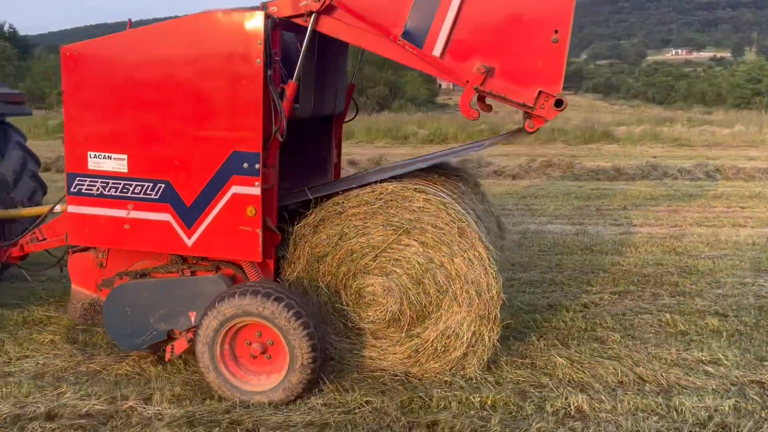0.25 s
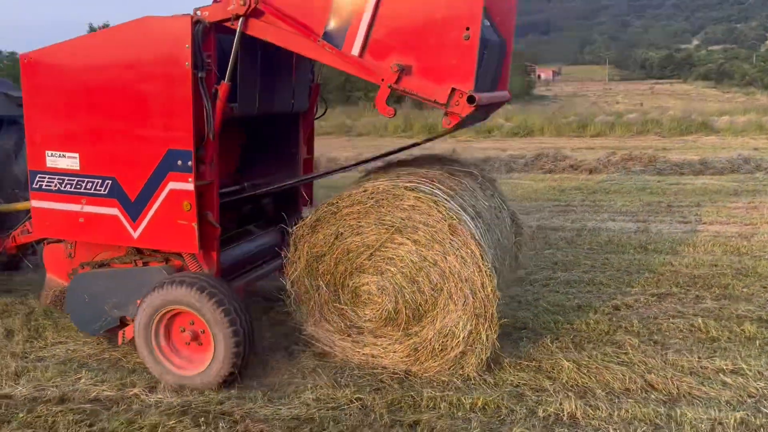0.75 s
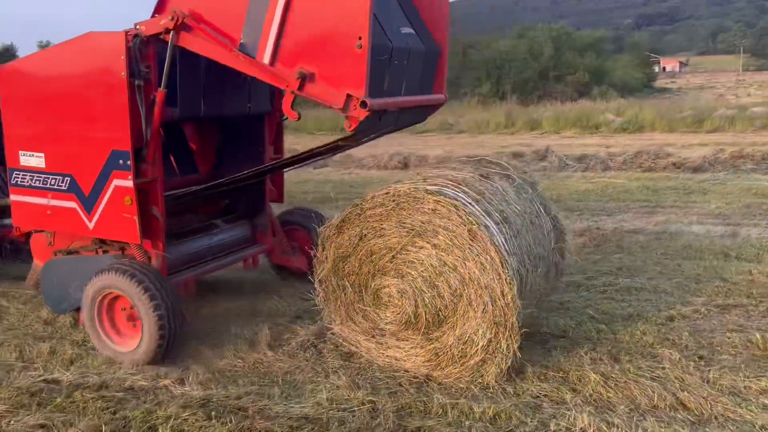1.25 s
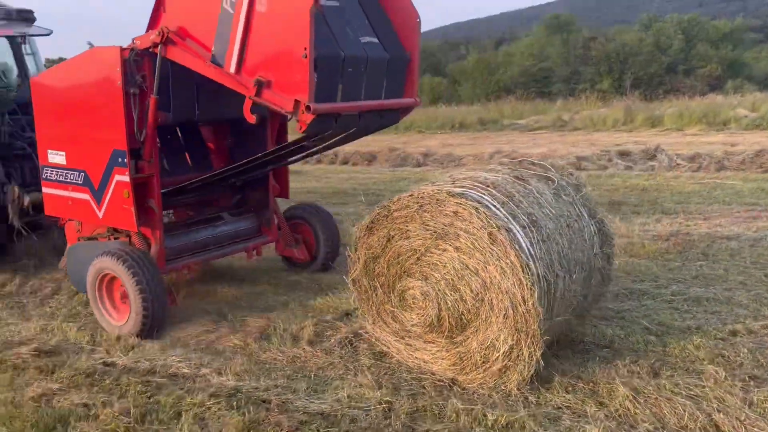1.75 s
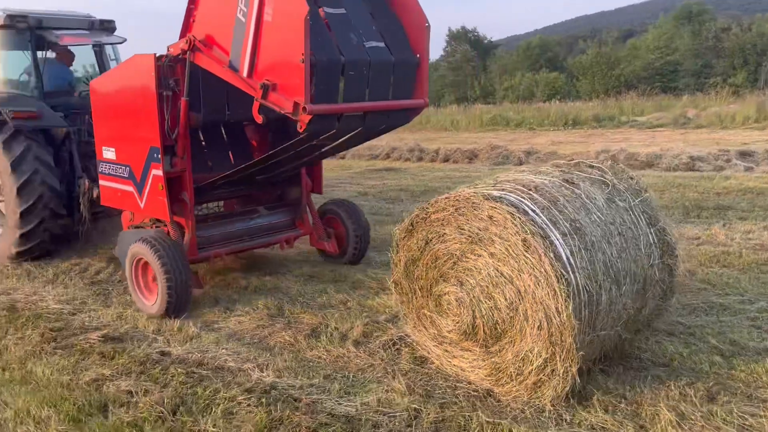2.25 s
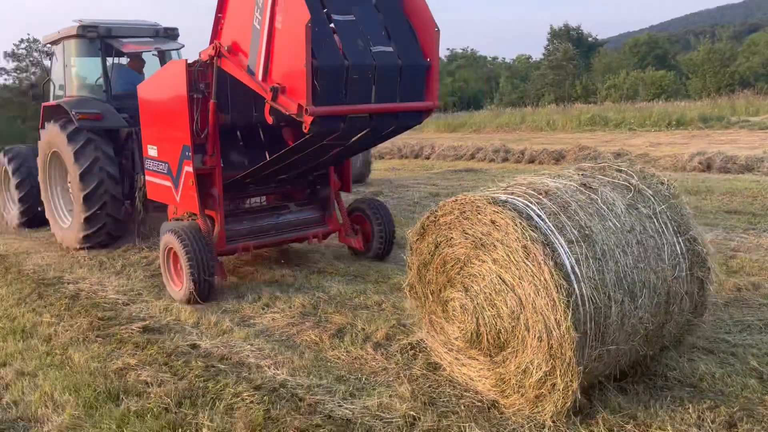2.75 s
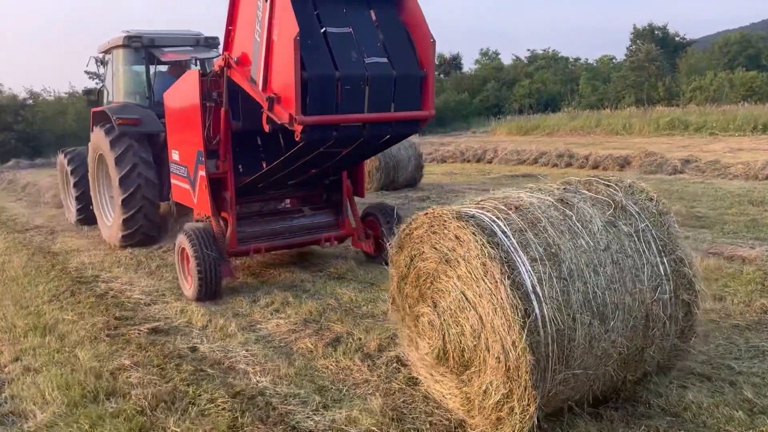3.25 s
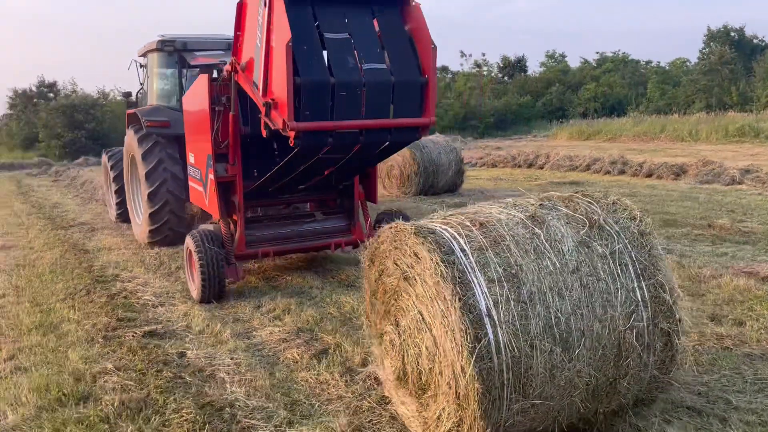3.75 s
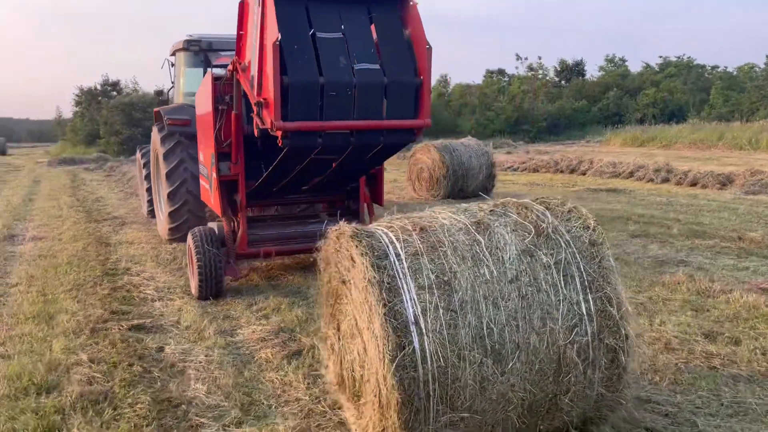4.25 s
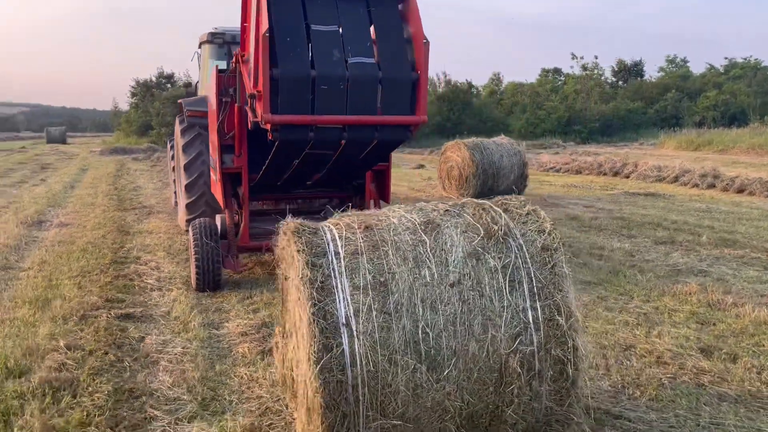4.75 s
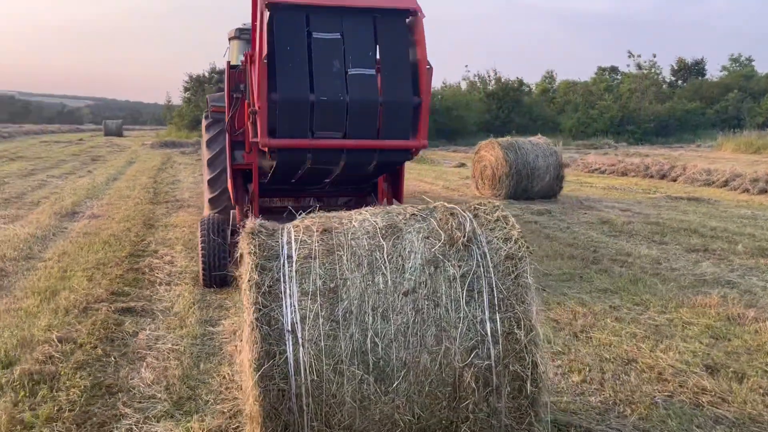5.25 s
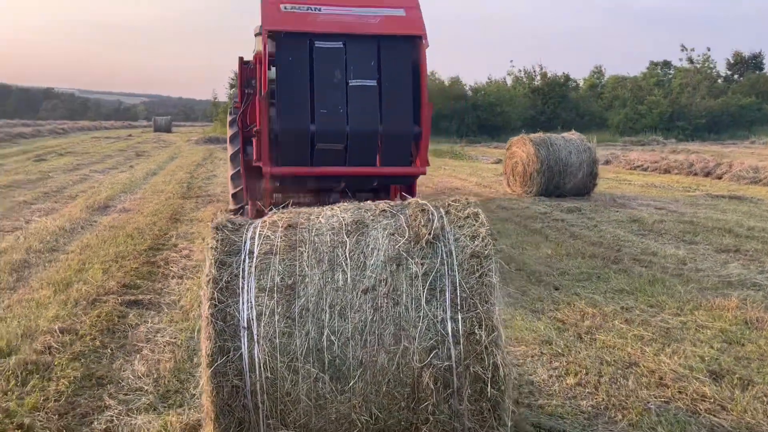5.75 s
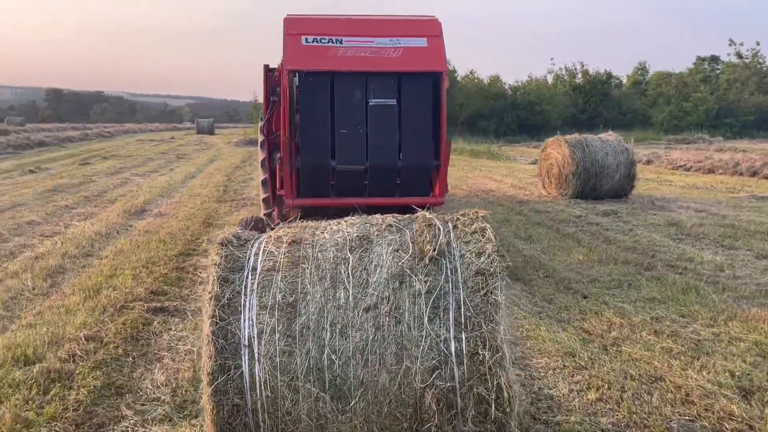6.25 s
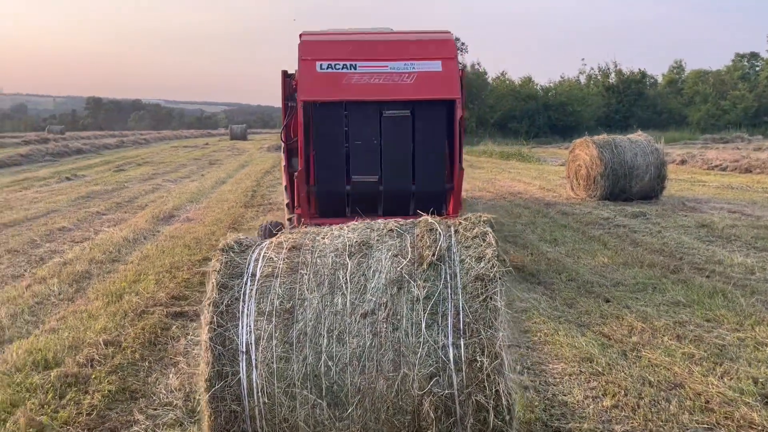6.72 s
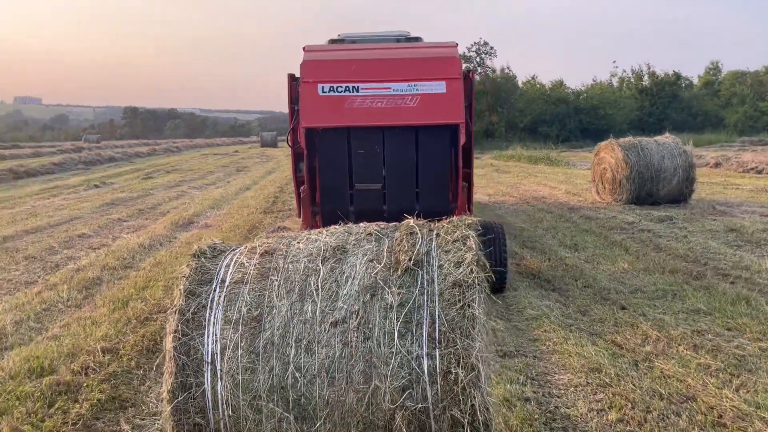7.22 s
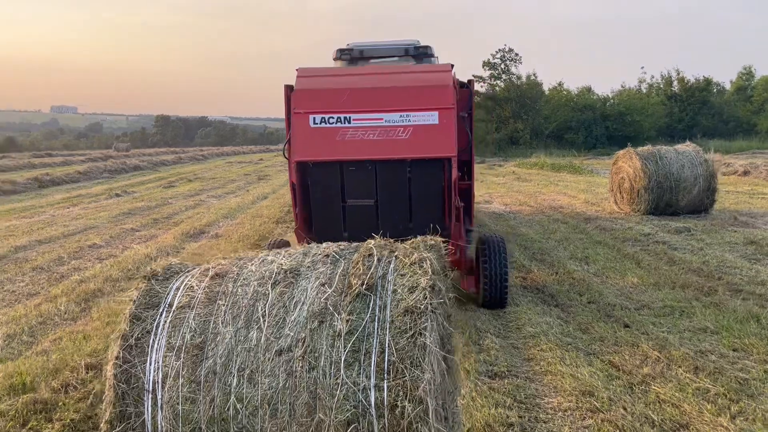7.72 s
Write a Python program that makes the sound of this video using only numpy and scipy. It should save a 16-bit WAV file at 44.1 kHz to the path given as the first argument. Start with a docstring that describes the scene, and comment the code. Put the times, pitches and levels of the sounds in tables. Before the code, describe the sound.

Tractor engine labours and recovers beside rattling chains and rollers; the clatter recedes, wind buffets grow, and small metallic squeaks sound in rhythm.

```python
"""Tractor and round baler leaving

A diesel tractor pulls a round baler away across a hay field: the engine bogs down, recovers and hums on
while the listener walks round behind. Engine tones follow the firing rate; clatter and wind are shaped noise.
Wind rumbles on the microphones, the tailgate hinge squeals once, a small part squeaks in rhythm
and a cricket chirps near the end: these are short tones."""
import sys
import numpy as np
from scipy import signal
from scipy.fft import rfft, irfft
from scipy.io import wavfile
from scipy.ndimage import uniform_filter1d, map_coordinates

SR = 44100
rng = np.random.default_rng(int(sys.argv[2]) if len(sys.argv) > 2 else 0)


def put_to_file(sound):
    """Save the sound as 16-bit audio at rate SR, in the file named by the first command-line argument."""
    columns = np.atleast_2d(sound).T  # one column per channel
    safe = np.clip(columns, -1, 1)
    whole_steps = np.round(safe * 32767)
    wavfile.write(sys.argv[1], SR, whole_steps.astype(np.int16))


N = 351907

# Spectrum tables give relative noise density; the level is set elsewhere.

# engine: time_s, firing_rate_hz, firing_tone_db, octave_db, fan_tone_db
ENGINE_COURSE = [(0, 80.6, -40, -31, -37), (.2, 80.2, -40, -32, -38), (.29, 77, -39, -43, -44),
                 (.36, 73.5, -36, -40, -50), (.56, 66.5, -34, -39, -52), (.7, 64.5, -34, -41, -52),
                 (.89, 66.5, -35, -41, -51), (1.07, 75, -39, -42, -48), (1.2, 80, -42, -44, -42),
                 (1.4, 80.7, -46, -46, -38), (2.7, 81.1, -50, -50, -41), (3.5, 81.1, -50, -50, -37),
                 (5, 81.1, -50, -43, -37), (6, 81, -50, -39, -35), (7, 80.9, -50, -39, -35.5),
                 (7.98, 80.9, -50, -36, -38)]
# gear and shaft tones: multiple of firing rate, five level_db evenly spaced over the scene, pitch_waver_hz
GEAR_TONES = [(3.19, -66, -57, -49, -42, -49, 2.34), (3.335, -71, -74, -55, -43.5, -60, 2.5),
              (3.524, -58, -56, -55.5, -55, -51.5, 2.96), (7.575, -50, -62.5, -54.5, -55.5, -61.5, 1.73),
              (12.06, -52, -61, -62.5, -67, -73, 4), (16.12, -75, -61, -57.5, -73, -85, 2.5)]
# pump tone between spells, for multiples 1 to 5 of its tooth rate: level_db
PUMP_FAINT_DB = [-60, -71, -63.5, -74, -69.5]
# hydraulic gear pump, a list for each multiple, heard in spells as the baler body turns: start_s, end_s, level_db
PUMP_SPELLS = [
    [(-.1, .25, -53), (1.1, 2.9, -48), (2.9, 4.38, -45.5), (5.6, 8.1, -54)],
    [(-.1, .28, -42), (.3, .52, -48), (.9, 1.2, -50), (1.45, 2, -54), (2.2, 3.4, -51), (3.4, 4.4, -49),
     (4.4, 5.3, -53.5), (5.3, 5.6, -62), (6.3, 8.1, -63)],
    [(-.1, .2, -51), (.18, .5, -42), (.85, 1.05, -45), (1.1, 1.27, -45), (1.45, 1.9, -47), (3.8, 4.35, -57),
     (5.6, 5.85, -63), (6.1, 7.2, -64)],
    [(1.5, 2.4, -50), (2.9, 3.1, -54), (3.5, 4.2, -55.5)],
    [(1.4, 1.7, -65), (2, 2.32, -65), (3.4, 3.75, -73), (5.4, 5.7, -76)],
]
# engine block growl under load: time_s, level_db
GROWL_LEVEL = [(0, -53), (.25, -50.5), (.6, -51), (1.1, -50), (1.35, -58), (2.2, -66), (7.98, -70)]
# clear growl tones: multiple of firing rate, level_over_growl_db
GROWL_TONES = [(3, -13.5), (3.5, -7), (4, -3.5), (4.5, -4), (5.5, -10.5), (6.5, -7.5), (7, -5.5), (7.5, -4),
               (8, -8.5), (8.5, -8), (9.5, -12.5), (12, -8.5), (12.7, -6.5), (13.7, -6.5), (14.5, -5.5),
               (18, -7.5), (19, -9)]
# exhaust bark: time_s, level_db
EXHAUST_LEVEL = [(0, -48), (.3, -40), (1.15, -40), (1.4, -50), (3, -58), (7.98, -58)]
# pulse strength of each cylinder in firing order: level_db
CYLINDER_DB = [0, -12, 0, -13]
# colour of the exhaust pipe: pitch_hz, gain_db
PIPE_COLOUR = [(170, -29), (230, -6), (290, 3), (330, -2.5), (400, -12.5), (520, -6.5), (600, -4.5),
               (750, -9.5), (1050, -10), (1300, -4.5), (1550, -13), (1800, -26.5)]
# turbocharger whistle: time_s, pitch_hz, level_db
TURBO_WHISTLE = [(0, 4380, -78), (.3, 4160, -53), (.8, 4370, -72), (1.15, 4570, -61), (1.6, 4420, -60.5),
                 (2.2, 4090, -62.5), (2.8, 3920, -79)]
# clatter, sinking as the baler draws off and hides behind the bale: time_s, level_db
CLATTER_LEVEL = [(0, -46), (.93, -45), (1.8, -50.5), (2.6, -53), (4.2, -54), (5.1, -56.5), (5.6, -59.5),
                 (6.1, -60), (7.3, -61), (7.98, -59)]
# exhaust roar spectrum: pitch_hz, density_db_per_hz
ROAR_SPECTRUM = [(60, -25), (150, -12), (300, 2), (500, -1.5), (800, -2), (1250, -2), (1600, -7.5),
                 (1900, -26), (2600, -42.5)]
# chain and roller clatter spectrum: pitch_hz, density_db_per_hz
CLATTER_SPECTRUM = [(1200, -26), (1800, 5), (2200, -6), (2500, -1.5), (2800, -3.5), (3100, -4.5),
                    (3600, -6.5), (4700, -5), (5300, -11), (6500, -14.5), (8000, -37.5)]
# air hiss spectrum: pitch_hz, density_db_per_hz
HISS_SPECTRUM = [(5500, -16.5), (7000, 1.5), (8500, 3.5), (9600, -3), (10300, -1.5), (11000, -1.5),
                 (11700, -6.5), (11950, -29)]
# panel rattle: time_s, level_db
RATTLE_LEVEL = [(0, -44), (.3, -40), (1.1, -43), (1.5, -59), (3, -69), (7.98, -59)]
# panels shaken under load: pitch_hz, density_db_per_hz
RATTLE_SPECTRUM = [(450, -16), (650, -8.5), (1300, 0), (1600, 7.5), (1850, -18), (2300, -2.5), (2600, -12),
                   (2850, -15.5), (3150, -8.5), (3500, -20.5)]
# belt and bearing whines: pitch_hz, pitch_waver_hz, faint_over_clatter_db, clear_start_s, clear_end_s,
# added_clear_over_clatter_db, fade_s
WHINES = [(3077, 30, -24.5, 2, 5.4, -15.5, .5), (4460, 35, -26.5, 1.6, 3.8, -18.5, .5),
          (4880, 30, -29.5, 2.9, 3.75, -15, .15), (5840, 37, -38, 2, 5, -19.5, 1)]
# tones that keep their pitch when the engine bogs down: pitch_hz, faint_db, spells of (start_s, end_s, level_db)
STEADY_TONES = [(1064, -69, [(-.1, .3, -46), (.4, .57, -43.5), (1.2, 2, -53.5), (2.3, 2.6, -56),
                (4.4, 5.3, -62.5), (6.15, 6.6, -64.5), (7.2, 8.1, -64.5)]), (1603, -69.5, [(-.1, .3, -48),
                (.5, .72, -43.5), (1.3, 2, -53), (2, 2.6, -58), (5.9, 6.9, -70)])]
# tailgate pivot slips: start_s, length_s, slip_rate_hz, level_db, overtone_flare_s, flare_db
HINGE_SLIPS = [(5.146, 0.05, 1928, -46, 5.182, -56.5), (5.2, .08, 1922, -47, 5.25, -72),
               (5.288, 0.06, 1914, -48.5, 5.332, -59.5), (5.355, .045, 1895, -58, 5.395, -63)]
# rhythmic squeaks: time_s, peak_db (before roughening)
SQUEAKS = [(3.83, -50), (3.9454, -54), (4.0467, -57), (4.16, -53), (4.262, -55), (4.37, -52),
           (4.468, -50.5), (4.572, -49.5), (4.674, -50), (4.782, -52), (4.89, -54), (5.002, -53.5),
           (5.102, -54.5), (5.207, -51), (5.308, -51.5), (5.42, -53), (5.545, -54), (5.66, -59),
           (5.765, -60)]
# swells of the faint tone under the squeaks: start_s, end_s, level_db
RUB_SPELLS = [(3.58, 3.88, -64), (4.4, 4.85, -74), (7.8, 8.1, -72)]
# cricket chirps: start_s, peak_db (before roughening)
CHIRPS = [(6.312, -65), (7.0, -63.5), (7.341, -62), (7.674, -61)]
# wing strokes of one chirp: level_over_chirp_db, pitch_hz (the pitch slides around it)
WING_STROKES = [(-4, 4680), (-0.5, 4870), (0, 4890)]
# soft tick from the baler: peak_s, level_db
TICKS = [(5.922, -49.5)]
# tick resonances: pitch_hz, density_db_per_hz
TICK_SPECTRUM = [(700, -20), (1200, 7), (1800, -12), (2450, -1), (3300, -19), (3900, -12), (4300, -1),
                 (4800, -16), (7400, -20)]
# steady wind: time_s, rumble_db, flutter_db, ruffle_db
STEADY_WIND = [(0, -45.5, -42, -72), (.9, -39, -41, -63), (1.7, -37.5, -41, -50), (2.1, -33.5, -35, -49),
               (2.5, -35.5, -39.5, -57), (2.75, -32, -41, -56), (2.9, -32.5, -30, -50),
               (3.5, -30, -36, -45), (4.1, -32, -36.5, -43), (4.8, -27, -37.5, -44.5),
               (5.4, -29.5, -43.5, -46.5), (6.2, -28.5, -34.5, -42.5), (6.7, -29.5, -36.5, -42),
               (7.1, -28.5, -30.5, -39.5), (7.6, -24, -26.5, -37.5), (7.8, -36, -25, -41),
               (7.98, -41, -27, -36)]
# wind buffets: peak_s, width_s, rumble_db, flutter_db, ruffle_db
BUFFETS = [(1.817, 0.039, -30, -44, -56), (2.091, 0.014, -28, -20.5, -39), (2.218, 0.044, -32, -43, -53),
           (2.31, 0.062, -30, -55, -49), (2.649, 0.014, -36, -28.5, -55), (2.685, 0.0094, -26, -34, -31),
           (2.782, 0.024, -39, -28, -49), (2.868, 0.012, -36, -36, -33.5), (2.908, 0.017, -28, -40, -38),
           (2.947, 0.012, -20, -35, -51), (2.995, 0.02, -37, -29, -52), (3.118, 0.037, -22, -28, -44),
           (3.207, 0.011, -18, -21, -42.5), (3.358, 0.033, -37, -27, -50), (3.412, 0.028, -29, -37, -40),
           (3.63, 0.058, -37, -29.5, -57), (3.68, 0.023, -31, -54, -58), (3.76, 0.047, -29, -34, -56),
           (3.859, 0.036, -22, -35, -54), (3.914, 0.022, -22, -28, -40), (4.263, 0.017, -26, -22, -36),
           (4.337, 0.037, -37, -27, -43), (4.375, 0.015, -37, -31, -52), (4.43, 0.02, -25.5, -42, -47),
           (4.553, 0.026, -24, -39, -42), (4.7, 0.011, -20, -20.5, -29), (4.84, 0.032, -29, -31, -35.5),
           (4.982, 0.016, -32, -29, -37), (5.06, 0.016, -26, -28, -37), (5.144, 0.034, -35, -30, -41),
           (5.2, 0.014, -41, -32, -36.5), (5.272, 0.015, -22.5, -27.5, -52),
           (5.544, 0.066, -28.5, -30.5, -42), (5.617, 0.021, -28, -31, -45), (5.733, 0.014, -21, -40, -42),
           (5.894, 0.01, -22, -42, -40), (5.946, 0.016, -25, -34, -37), (6.115, 0.026, -30, -41, -44),
           (6.207, 0.037, -32, -30, -39), (6.277, 0.01, -21, -19.5, -50), (6.342, 0.012, -25, -20, -32.5),
           (6.428, 0.024, -18.5, -25.5, -41.5), (6.502, 0.1, -27, -28.5, -39.5),
           (6.894, 0.032, -26, -37, -40), (7.024, 0.048, -24, -28, -38), (7.256, 0.037, -28.5, -28, -37),
           (7.293, 0.047, -17, -26.5, -42), (7.338, 0.017, -25, -24.5, -30.5),
           (7.427, 0.017, -18, -20.5, -35), (7.721, 0.028, -21, -20, -41), (7.76, 0.012, -19.5, -16, -34.5)]
# deep wind: pitch_hz, density_db_per_hz
RUMBLE_SPECTRUM = [(15, -37.5), (28, -28.5), (40, -8), (52, -5), (75, 1), (100, -0.5), (125, -8.5),
                   (170, -27)]
# middle wind: pitch_hz, density_db_per_hz
FLUTTER_SPECTRUM = [(80, -31.5), (120, 1), (160, 1.5), (210, -5.5), (260, -13), (340, -38.5)]
# light wind: pitch_hz, density_db_per_hz
RUFFLE_SPECTRUM = [(180, -26), (240, 0), (290, -2.5), (350, -13.5), (430, -16.5), (600, -21.5)]
# wind: pitch_hz, left_right_likeness (0 to 1)
WIND_LIKENESS = [(30, .88), (100, .82), (200, .68), (350, .7)]
# machine noise: pitch_hz, left_right_likeness (0 to 1)
MACHINE_LIKENESS = [(60, .85), (500, .86), (1000, .84), (1500, .8), (1750, .7), (2000, .9), (2250, .94),
                    (2500, .7), (3500, .6), (4700, .55), (5400, .75), (6300, .8), (6900, .45), (7600, 1),
                    (9300, 1), (10000, .4), (10600, 1), (12000, 1)]
# the two ports: pitch_hz, left_lead_for_source_ahead_rad, extra_lead_for_source_at_left_rad
PORT_LEAD = [(100, 0, .1), (320, 0, .3), (500, -.05, .75), (700, 0, 1.15), (900, .05, 1.7), (1100, 0, 2.1),
             (1400, .2, 2.7), (1700, .2, 2.9), (2000, .25, 0), (2400, .3, 0), (3000, .5, .3),
             (3900, .35, .3), (4900, -.15, 1.2), (5500, -.3, 0), (6940, -.5, 0)]
# level difference of the ports: pitch_hz, left_over_right_db
PORT_BALANCE = [(100, 0), (500, 0.5), (750, -1), (990, 4), (1192, -3.5), (1548, -7), (1754, 1.5),
                (2400, 0.5), (3040, 5), (4240, 3), (5000, 7), (5900, 0.5), (6940, -1.5)]
# phase flips in the treble, where both ports match in level: pitch_hz, half_turns
PORT_FLIPS = [(6600, 0), (7600, -1), (9600, -1), (10500, -2)]
# how far left the tractor stands: time_s, leftness (0 to 1)
LEFTNESS = [(0, 1), (1.2, .97), (2, .72), (3.2, .44), (4.7, .32), (5.7, .08), (7.98, 0.02)]

FAN_ORDER, PUMP_ORDER = 2.53, 416 / 81  # multiples of the firing rate
FIRING_JITTER, FIRING_SCATTER_DB = .002, .8  # uneven timing (share of a period) and strength
SMEAR_T60_S = .025  # time for the exhaust smear to fall 60 dB
ROAR_START_DB, HISS_START_DB = -39, -55
ROAR_FOLLOWS, HISS_FOLLOWS = 0.63, 1  # dB lost for each dB of clatter lost
SLIP_FADE_S, FLARE_WIDTH_S = .015, .02
OVERTONE_DB = -23  # octave under the hinge tone outside flares
SQUEAK_HZ, SQUEAK_S = 2462, 0.05  # the pitch slides around this
SQUEAK_LEAD_S = 0.0054  # a squeak starts softly this early
RUB_HZ, RUB_FAINT_DB = 2425, -71
STROKE_S, STROKE_GAP_S = 0.024, .033  # length of a wing stroke, start to start
TICK_WIDTH_S = .016
LULL_DB, LULL_RATE_HZ = 3, 10  # random unevenness of the steady wind
TOP_HZ = 11950  # no sound is passed on much above this


def amp(db):
    """Turn decibels into a plain gain."""
    return 10 ** (np.asarray(db) / 20)


def unit(x):
    """Scale to an rms of 1."""
    return x / np.sqrt(np.mean(x ** 2) + 1e-20)


def along(points, hz):
    """Read each column of a table at the given pitches, on a log pitch axis."""
    f, *columns = np.transpose(points)
    return np.squeeze([np.interp(np.log(hz + 1), np.log(f + 1), c) for c in columns])


def curves(rows):
    """One value per sample for each column after the time."""
    s, *columns = np.transpose(rows)
    return [np.interp(np.arange(N) / SR, s, c) for c in columns]


def wobble(rate):
    """A smooth random curve through rate random points a second."""
    points = rng.standard_normal(int(N * rate / SR) + 4)
    return map_coordinates(points, [np.arange(N) * rate / SR])


def spells(rows, fade_s):
    """Summed gain of (start_s, end_s, level_db) stretches with soft edges."""
    t = np.arange(N) / SR
    total = 0
    for start, end, db in rows:
        rise = np.tanh(2 * (t - start) / fade_s)
        fall = np.tanh(2 * (t - end) / fade_s)
        total = total + amp(db) * (rise - fall) / 2
    return total


def bells(rows):
    """Summed gain of (peak_s, width_s, level_db) swells; the width is taken 3 dB under the peak."""
    out, u = np.zeros(N + SR), np.arange(-SR // 4, SR // 4) / SR
    for s, width_s, db in rows:
        out[round(s * SR):][:len(u)] += amp(db) * np.exp(-np.log(4) * (u / width_s) ** 2)
    return out[SR // 4:][:N]


def tone(hz, db, width_hz, count=25):
    """A sine near rms level db; its level wavers and its pitch wavers count times a second."""
    phase = 2 * np.pi * np.cumsum(hz + width_hz * wobble(count)) / SR
    level = amp(db + 1.3 * wobble(12))
    return np.sqrt(2) * level * np.sin(phase + 2 * np.pi * rng.random())


def rush(spectrum, alike, patchy_db, size=1024):
    """Stereo noise of rms 1 with patches of random gain, silent outside its spectrum."""
    hz, _, (a, b) = signal.stft(rng.standard_normal((2, N)), SR, nperseg=size)
    patches = uniform_filter1d(rng.standard_normal(a.shape), size=6, axis=0)
    patches = uniform_filter1d(patches, size=5, axis=1)
    inside = (hz > spectrum[0][0]) & (hz < spectrum[-1][0])
    gain = amp(along(spectrum, hz)[:, None] + patchy_db * unit(patches)) * inside[:, None]
    # the more alike the sides, the more of the shared noise
    turn = np.arccos(np.clip(along(alike, hz), 0, 1))[:, None] / 2
    mid, side = a * np.cos(turn), b * np.sin(turn)
    return unit(signal.istft(gain * [mid + side, mid - side], nperseg=size)[1][:, :N])


def strokes(rows, length_s, glide, bend, fullness):
    """Short swelling tones from rows (start_s, peak_db, pitch_hz); the pitch slides by the share glide."""
    out, u = np.zeros(N + SR), np.arange(round(length_s * SR)) / (length_s * SR)
    swell = np.sin(np.pi * u ** .8) ** fullness
    for s, db, hz in rows:
        phase = 2 * np.pi * np.cumsum(hz * (1 + glide * (u ** bend - .2))) / SR
        out[round(s * SR):][:len(u)] += amp(db) * swell * np.sin(phase)
    return out[:N]


def engine():
    """Firing tones, fan, gears and the pump all follow the crankshaft."""
    hz, first_db, octave_db, fan_db = curves(ENGINE_COURSE)
    out = tone(hz, first_db + 1.3 * wobble(19), 1.77)
    out = out + tone(2 * hz, octave_db + 2.0 * wobble(21), 1.45)
    out = out + tone(FAN_ORDER * hz, fan_db, 1.524)
    for multiple, *steps_db, width_hz in GEAR_TONES:
        level_db = np.interp(np.arange(N), np.linspace(0, N, len(steps_db)), steps_db)
        out = out + tone(multiple * hz, level_db + 0.49 * wobble(1.7), width_hz)
    for k, (faint_db, rows) in enumerate(zip(PUMP_FAINT_DB, PUMP_SPELLS), 1):
        gain = amp(faint_db) + spells(rows, PUMP_FADE_S)
        # higher multiples waver more
        uneven_db = (1 + .2 * k) * wobble(5) + .35 * k * wobble(20)
        out = out + gain * tone(k * PUMP_ORDER * hz, uneven_db, 1.1 * k)
    return out


PUMP_FADE_S = .18


def growl():
    """Under load the block sings on whole multiples of the firing rate and others between."""
    hz, load_db = curves(ENGINE_COURSE)[0], curves(GROWL_LEVEL)[0]
    return sum(tone(k * hz, load_db + db + 3.5 * wobble(9), .55 * k) for k, db in GROWL_TONES)


def exhaust():
    """One uneven pulse a firing, coloured by the pipe and smeared by the bodywork."""
    turns = np.cumsum(curves(ENGINE_COURSE)[0]) / SR
    k = np.arange(int(turns[-1]))
    late, size = rng.standard_normal((len(k), 2)).T
    pulses = np.zeros(N)
    places = np.searchsorted(turns, k + FIRING_JITTER * late)
    pulses[places] = amp(np.take(CYLINDER_DB, k % 4) + FIRING_SCATTER_DB * size)
    t = np.arange(SR // 10) / SR
    smear = rng.standard_normal(len(t)) * amp(-60 * t / SMEAR_T60_S)
    smear_phase = np.exp(1j * np.angle(rfft(smear, N)))  # spreads the pulses without colouring them
    hz = np.fft.rfftfreq(N, 1 / SR)
    colour = amp(along(PIPE_COLOUR, hz)) * (hz < PIPE_COLOUR[-1][0])
    bark = irfft(rfft(pulses) * smear_phase * colour, N)
    return amp(curves(EXHAUST_LEVEL)[0] + 1.9 * wobble(6.5)) * unit(bark)


def turbo():
    """The turbocharger spools up under load: a breathy whistle and its octave."""
    hz, db = curves(TURBO_WHISTLE)
    return tone(hz, db, 220, count=400) + tone(2 * hz, db - 5, 130, count=300)


def machinery():
    """Exhaust roar, chain and roller clatter, air hiss; each firing gives roar and clatter a small kick."""
    clatter_db, = curves(CLATTER_LEVEL)
    lost_db = clatter_db - clatter_db[0]
    kick = np.cos(2 * np.pi * np.cumsum(curves(ENGINE_COURSE)[0]) / SR)
    shake = wobble(7)
    roar_gain = amp(ROAR_START_DB + ROAR_FOLLOWS * lost_db + 1.2 * shake + 0.5 * kick)
    clatter_gain = amp(clatter_db + 0.22 * shake + 0.34 * kick)
    hiss_gain = amp(HISS_START_DB + HISS_FOLLOWS * lost_db + 0.24 * shake)
    roar = roar_gain * rush(ROAR_SPECTRUM, MACHINE_LIKENESS, patchy_db=0.88)
    clatter = clatter_gain * rush(CLATTER_SPECTRUM, MACHINE_LIKENESS, patchy_db=1.8)
    hiss = hiss_gain * rush(HISS_SPECTRUM, MACHINE_LIKENESS, patchy_db=4)
    return roar + clatter + hiss


def rattle():
    """Sheet metal buzzes coarsely while the engine labours: noise with a fast, rough level."""
    gain = amp(curves(RATTLE_LEVEL)[0] + 0.93 * wobble(9) + 2.6 * wobble(60))
    return gain * rush(RATTLE_SPECTRUM, MACHINE_LIKENESS, patchy_db=0.0)


def whines():
    """Narrow, unsteady belt and bearing whistles that sink with the clatter."""
    clatter_db, = curves(CLATTER_LEVEL)
    total = 0
    for hz, width_hz, faint_db, *clear, fade_s in WHINES:
        gain = amp(faint_db) + spells([clear], fade_s)
        total = total + gain * tone(hz, clatter_db + 1.5 * wobble(30), width_hz, count=120)
    return total


def steady_tones():
    """Tones of a part with its own drive, so their pitch does not follow the engine."""
    return sum((amp(faint_db) + spells(rows, 0.083)) * tone(hz, 1.1 * wobble(17), 3)
               for hz, faint_db, rows in STEADY_TONES)


def hinge():
    """The tailgate pivot sticks and slips; the overtones flare once in each slip."""
    s, length_s, hz, db, flare_s, flare_db = np.transpose(HINGE_SLIPS)
    slip = spells(zip(s, s + length_s, db), SLIP_FADE_S)
    flare = amp(OVERTONE_DB) * slip + bells((a, FLARE_WIDTH_S, b) for a, b in zip(flare_s, flare_db))
    rate_hz = np.interp(np.arange(N) / SR, s + length_s / 2, hz) + 6 * wobble(90)
    phase = 2 * np.pi * np.cumsum(rate_hz) / SR
    drops_db = (0, -17, -13, -15, -20)  # overtones 2 to 6 against the octave
    upper = sum(amp(drop_db) * np.sin(k * phase) for k, drop_db in enumerate(drops_db, 2))
    ground = slip * amp(2.2 * wobble(110)) * np.sin(phase)
    return np.sqrt(2) * (ground + flare * upper * amp(3 * wobble(70)))


def squeaks():
    """A small part squeaks in rhythm: short falling tones with a rough level."""
    rows = [(s - SQUEAK_LEAD_S, db, SQUEAK_HZ) for s, db in SQUEAKS]
    return strokes(rows, SQUEAK_S, glide=-.03, bend=.6, fullness=.8) * amp(2.5 * wobble(90))


def rub():
    """A faint wavering tone lies under the squeaks and swells at times."""
    gain = amp(RUB_FAINT_DB) + spells(RUB_SPELLS, 0.087)
    return gain * tone(RUB_HZ, 1.5 * wobble(9) + 2 * wobble(45), 9, count=60)


def tick():
    """A short puff of noise in three main resonances."""
    puff = bells((s, TICK_WIDTH_S, db) for s, db in TICKS)
    return puff * rush(TICK_SPECTRUM, MACHINE_LIKENESS, patchy_db=1)


def cricket():
    """Three wing strokes a chirp, each a short tone falling in pitch."""
    rows = [(s + k * STROKE_GAP_S, db + under_db, hz)
            for s, db in CHIRPS for k, (under_db, hz) in enumerate(WING_STROKES)]
    return strokes(rows, STROKE_S, glide=-.1, bend=3, fullness=1) * amp(3 * wobble(200))


def wind():
    """Deep rumble, flutter and lighter ruffle on the microphones; buffets swell out of the steady wind."""
    s, width_s, *buffet_db = np.transpose(BUFFETS)
    gains = []
    for steady_db, db in zip(curves(STEADY_WIND), buffet_db):
        steady = amp(steady_db + LULL_DB * wobble(LULL_RATE_HZ))
        gains.append(np.hypot(steady, bells(zip(s, width_s, db))))
    rumble, flutter, ruffle = gains
    out = rumble * eddies(RUMBLE_SPECTRUM, 0.066)
    out = out + flutter * eddies(FLUTTER_SPECTRUM, 0.03)
    return out + ruffle * eddies(RUFFLE_SPECTRUM, 0.015)


def eddies(spectrum, even_s):
    """Low wind noise whose eddies follow each other at a nearly even strength."""
    x = rush(spectrum, WIND_LIKENESS, patchy_db=0.85, size=4096)
    power = np.abs(uniform_filter1d(np.mean(x ** 2, 0), round(even_s * SR)))
    return unit(x / np.sqrt(power + 0.1))


def scene():
    """Everything in the field, added up before the two ports hear it."""
    power = engine() + growl() + exhaust() + turbo()
    baler = machinery() + rattle() + whines() + steady_tones()
    details = hinge() + squeaks() + rub() + tick() + cricket()
    return power + baler + details + wind()


def record(dry):
    """The ports differ in phase and level with direction, flip phase in a treble band and lose the top."""
    hz, t, z = signal.stft(dry, SR, nperseg=1024)
    (ahead, aside), balance_db = along(PORT_LEAD, hz), along(PORT_BALANCE, hz)
    flip = along(PORT_FLIPS, hz)
    fade = np.clip(1 + flip, 0, 1)[:, None]  # lead and balance vanish where the phase flips
    lead = ahead[:, None] + aside[:, None] * np.interp(t, *np.transpose(LEFTNESS))
    turn = np.exp(.5j * (fade * lead + np.pi * flip[:, None]))
    port = turn * amp(fade * balance_db[:, None] / 2)  # half to each side
    pair = signal.istft(z * [port, 1 / port], SR, nperseg=1024)[1][:, :N]
    low_pass = signal.ellip(12, .1, 90, TOP_HZ, fs=SR, output="sos")
    return signal.sosfiltfilt(low_pass, pair)


dry = scene()
out = record(dry)
put_to_file(out)
```